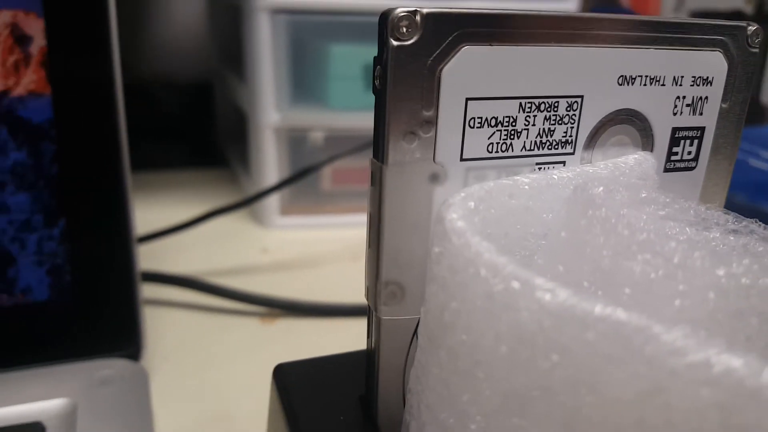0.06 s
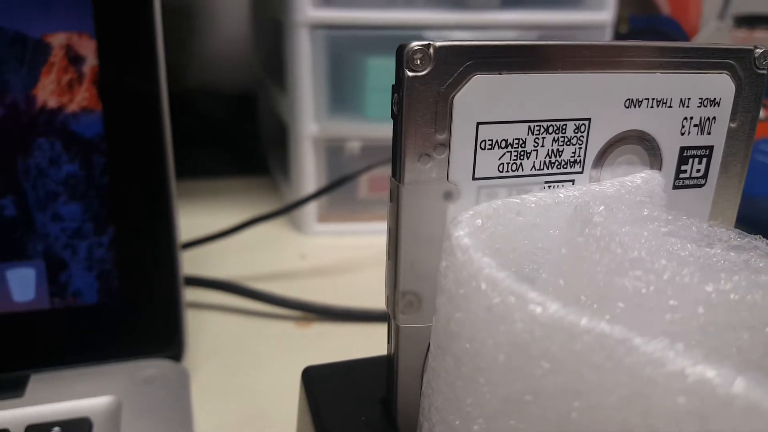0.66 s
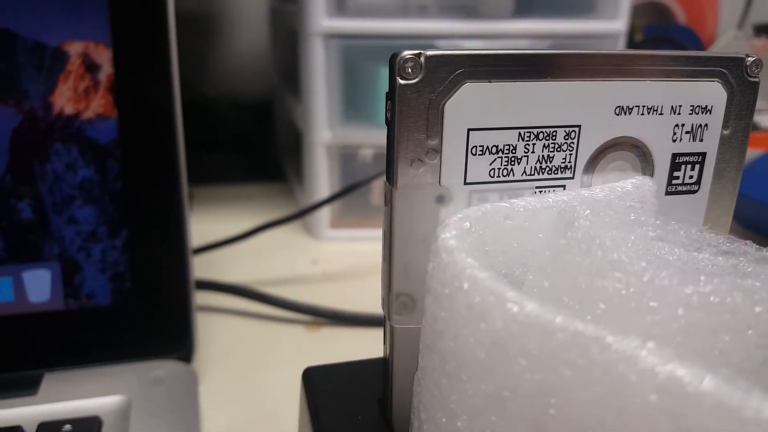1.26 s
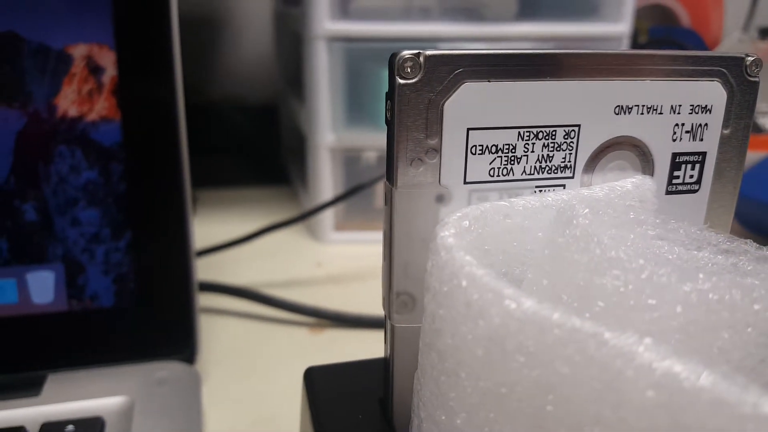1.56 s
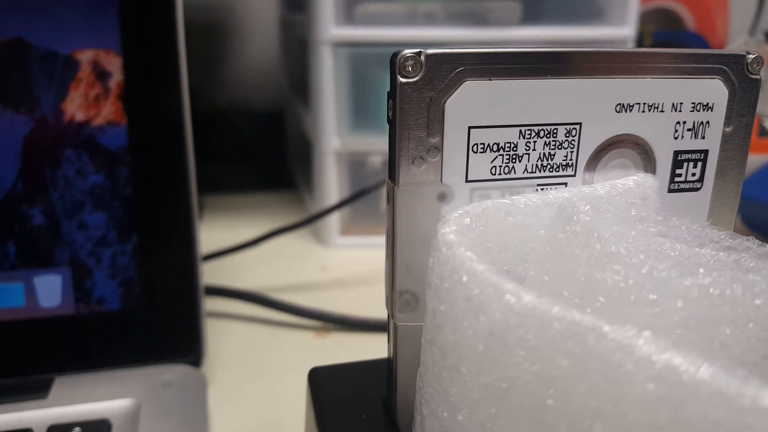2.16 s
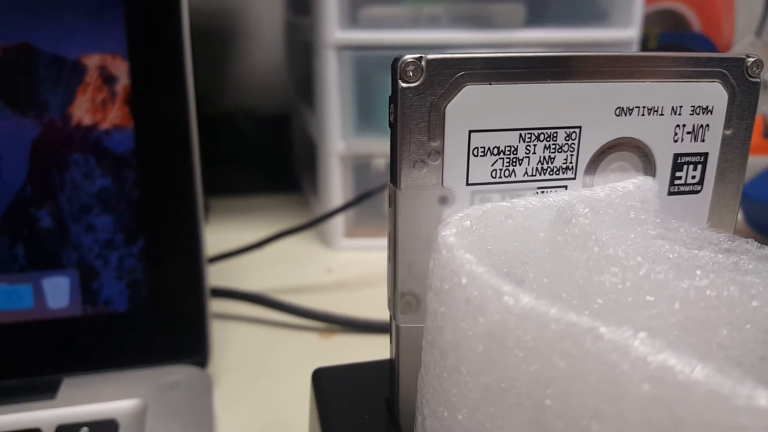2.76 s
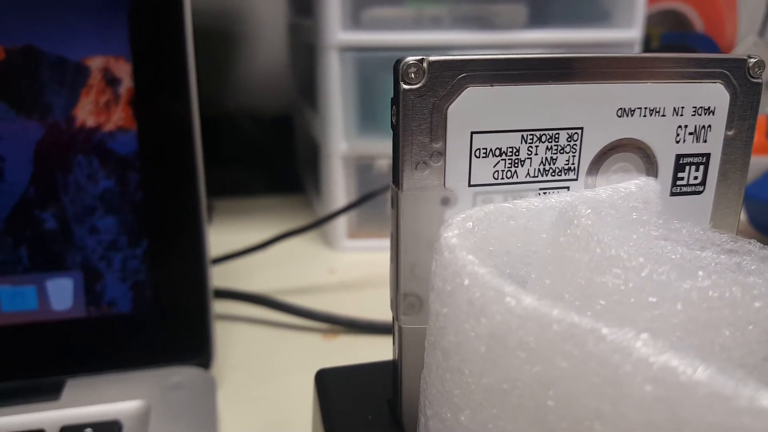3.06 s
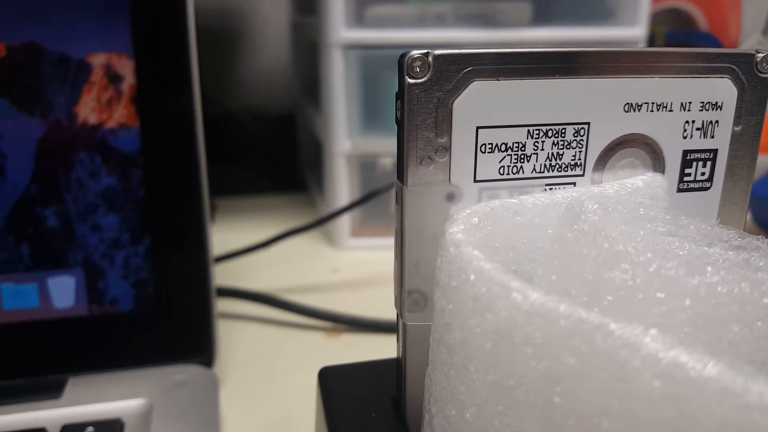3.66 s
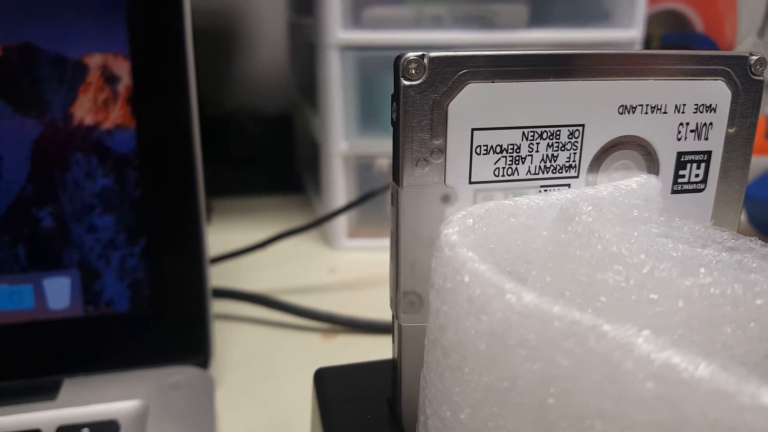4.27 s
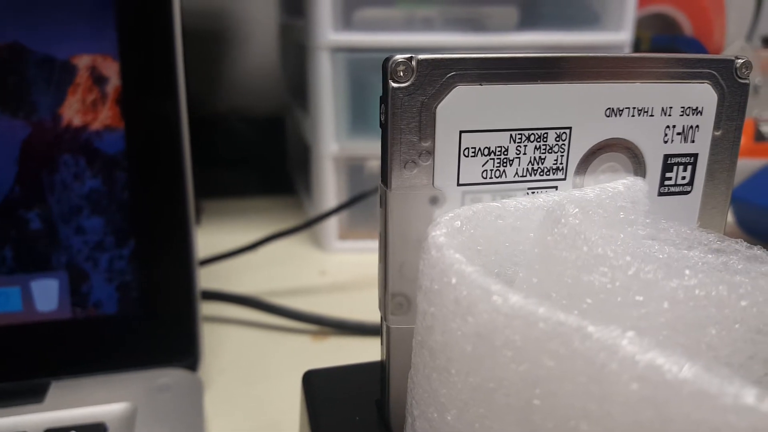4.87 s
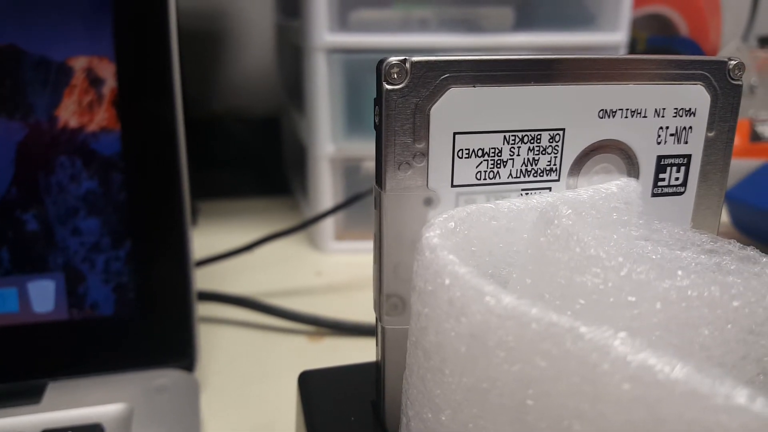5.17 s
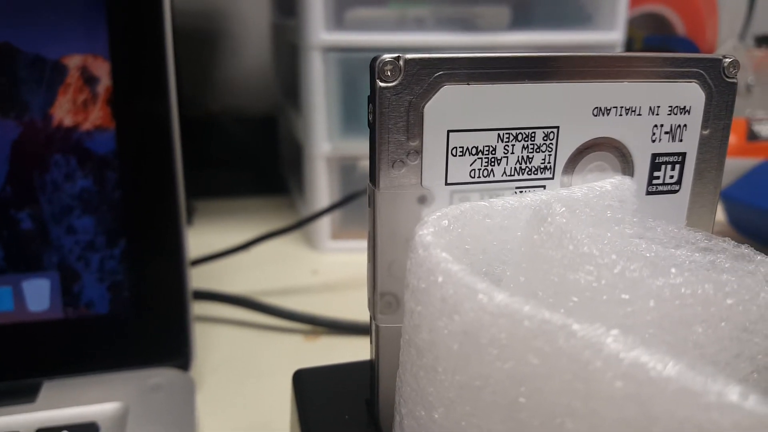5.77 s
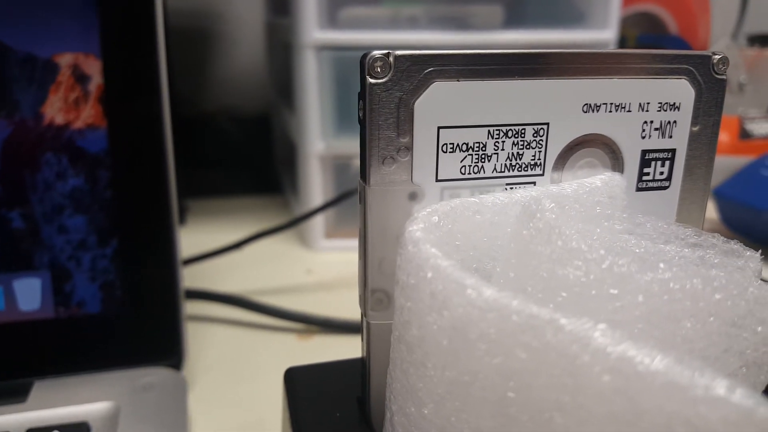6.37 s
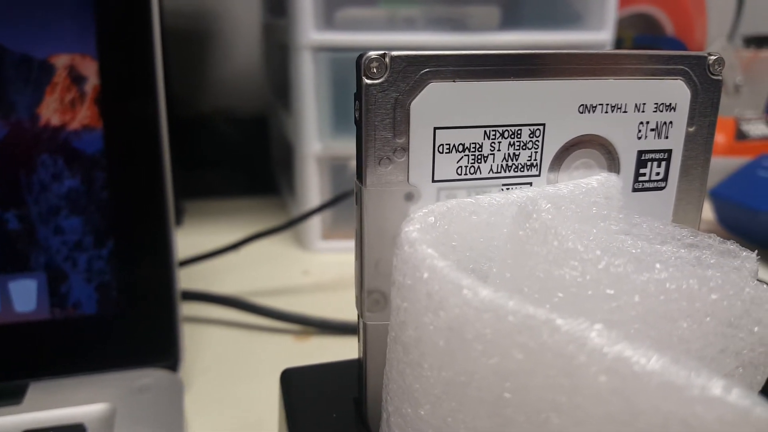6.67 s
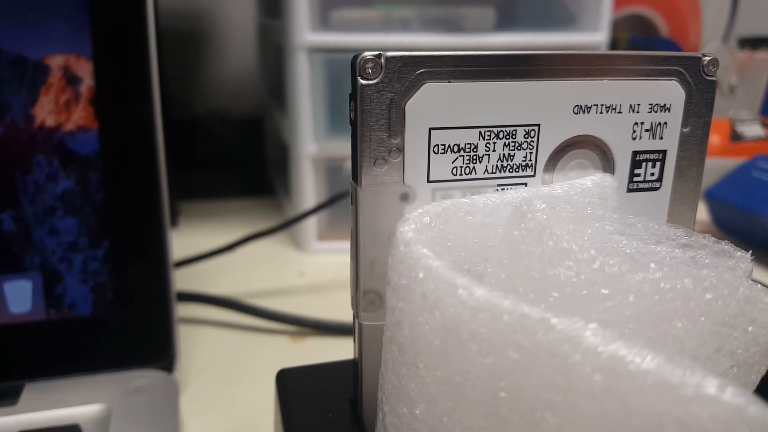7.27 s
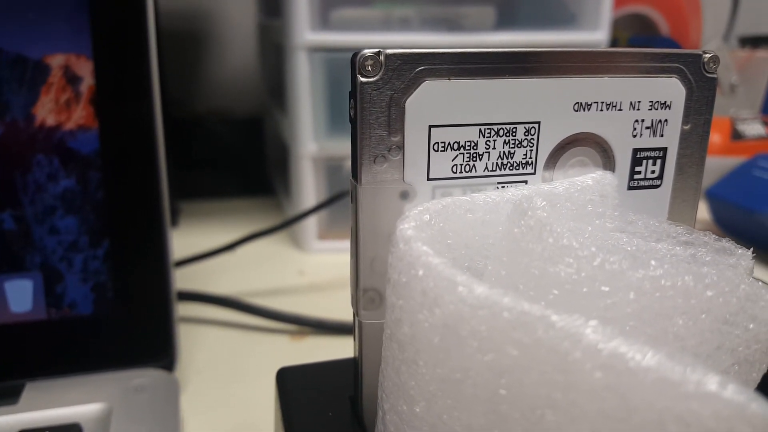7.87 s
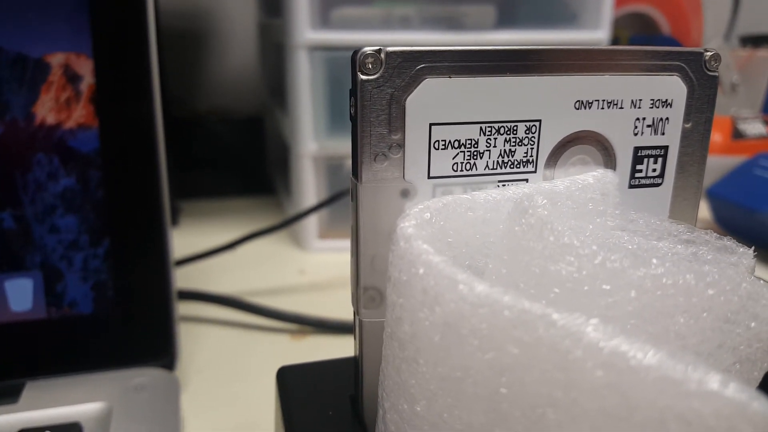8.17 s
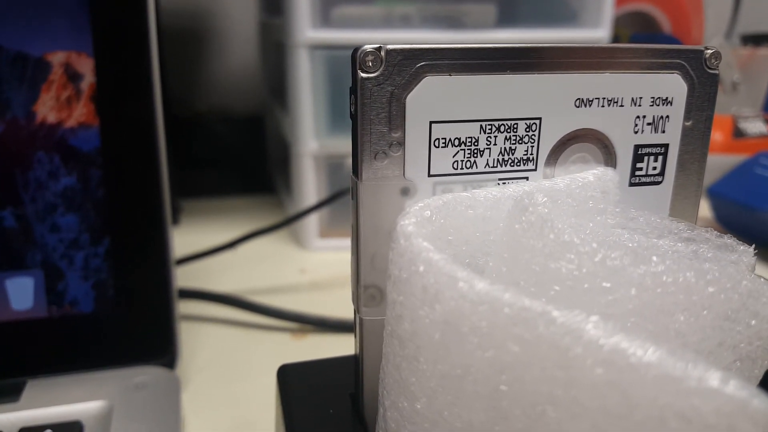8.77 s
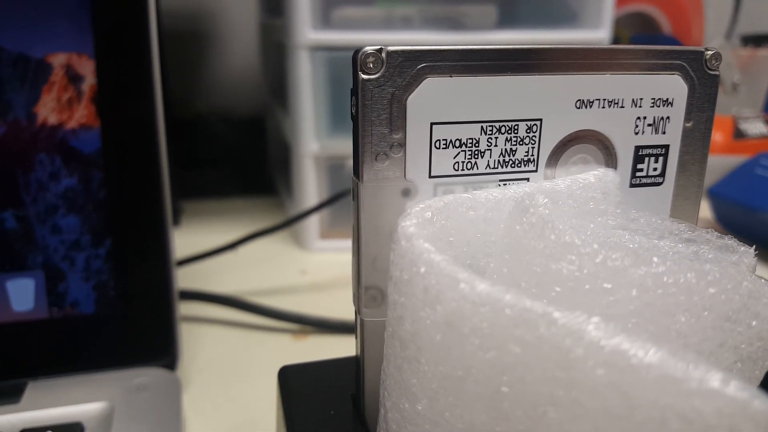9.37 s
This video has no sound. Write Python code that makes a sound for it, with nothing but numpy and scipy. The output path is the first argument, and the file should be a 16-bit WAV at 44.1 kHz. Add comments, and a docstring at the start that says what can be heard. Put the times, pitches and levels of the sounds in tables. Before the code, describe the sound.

Over a steady low rumble, a gently throbbing fan hum and a very faint high whine, a faulty hard drive stutters with quick runs of bright, scratchy, pinging clicks. It pauses and tries again, over and over. About four seconds in, an object gets one short, hollow, clattering knock, and then the bursts of clicking go on. The drive sounds close and fairly dry, indoors at a desk.

```python
"""On a desk, a failing laptop hard drive retries in bursts: its head arm swings and knocks on its stop.
Most swings scrape first, and a hard scrape brakes the landing. Each knock ticks in the casing and makes
the drive ping. Once, something is bumped: a hollow knock and a bright clatter.
Underneath sits a bed of room rumble, fan tones beating against the mains hum, and a thin high whine."""
import sys
import numpy as np
from scipy import signal
from scipy.fft import rfft, irfft
from scipy.io import wavfile

SR = 44100
rng = np.random.default_rng(int(sys.argv[2]) if len(sys.argv) > 2 else 0)


def inscribe(sig):
    """Save sig as 16-bit PCM at rate SR to the path in sys.argv[1].

    A 1-D sig is mono; a 2-D sig holds one channel per row.
    Samples are clipped to [-1, 1] before scaling.
    """
    pcm = np.round(np.clip(np.atleast_2d(sig).T, -1, 1) * 32767)
    wavfile.write(sys.argv[1], SR, pcm.astype(np.int16))


N = 424683

# the arm swings freely into its stop: (time [s], ping level [dB])
FREE_KNOCKS = [(0.501, -31.5), (1.102, -39), (2.3902, -37), (2.757, -38), (2.8788, -35.5), (3.001, -36.5),
               (3.2654, -36.5), (3.713, -34.5), (4.679, -35), (4.8593, -35), (6.7714, -34.5), (6.9673, -33),
               (7.512, -36), (9.0549, -35), (9.468, -34.5)]
# the arm scrapes, then lands: (time [s], length [s], treble rasp [dB], low buzz [dB], ping level [dB])
ARM_SCRAPES = [(0.3562, .009, -37.5, -49.5, -33.5), (0.428, 0.0067, -37, -50, -35.5),
               (0.551, .0079, -39, -50.5, -36.5), (0.9006, 0.011, -36.5, -50.5, -44),
               (0.9627, 0.0082, -36.5, -56, -32.5), (1.0318, 0.0047, -46, -64, -33.5),
               (1.148, 0.0085, -35.5, -49, -37), (1.205, .013, -63, -56, -85),
               (1.268, 0.011, -37.5, -54, -39), (2.438, 0.0072, -35, -56, -39),
               (2.502, 0.0046, -53, -60, -38), (2.558, 0.013, -59, -56, -36),
               (2.625, 0.0074, -36, -53, -38), (2.679, .011, -37, -51, -65), (2.801, 0.01, -60, -52, -34.5),
               (2.927, 0.0096, -37.5, -49.5, -65), (3.053, 0.0037, -40, -52, -70),
               (3.112, .012, -38, -50.5, -33.5), (3.183, 0.0085, -37, -51, -56),
               (3.509, 0.005, -55, -57, -37), (3.572, .013, -50.5, -52.5, -70),
               (3.64, .0097, -35, -51.5, -34.5), (4.335, .004, -58, -52, -90),
               (4.729, .0092, -54, -52.5, -36), (4.798, 0.0063, -35.5, -50, -49),
               (4.865, 0.0033, -35, -50, -65), (5.214, 0.0045, -34, -51.5, -43),
               (5.272, .011, -66, -59, -36), (5.334, .0105, -36.5, -51, -35),
               (5.394, .011, -61, -55, -34.5), (5.456, .0113, -61.5, -54, -39.5),
               (5.516, 0.011, -63.5, -57.5, -35), (5.578, 0.022, -62, -57, -90),
               (6.692, 0.017, -62, -55, -90), (6.817, 0.016, -37.5, -48, -47),
               (6.89, 0.0059, -35, -47.5, -34.5), (7.02, .0072, -51, -51, -39),
               (7.082, .012, -49.5, -56.5, -72), (7.155, 0.0039, -35.5, -44.5, -59),
               (7.56, .012, -47, -48.5, -79), (7.6273, .012, -51, -58, -34.5),
               (7.7001, 0.0072, -35, -52, -43), (8.037, 0.0039, -64, -57, -85),
               (8.114, 0.016, -60, -54.5, -90), (8.184, .0118, -47, -58, -32),
               (8.258, 0.0092, -43.5, -48.5, -73), (8.321, 0.011, -63, -58, -34.5),
               (8.679, 0.0052, -39.5, -51, -54), (8.736, .0044, -43.5, -59, -35),
               (8.795, 0.0051, -61, -55, -34.5), (8.85, 0.01, -65.5, -56, -33),
               (8.924, 0.0062, -38, -49, -53), (8.9906, 0.0051, -37, -49, -47),
               (9.391, 0.0096, -35.5, -59, -40), (9.515, 0.012, -60, -58, -34.5),
               (9.581, 0.012, -61, -53, -34.5)]
# some sweeps come with a low thump of the drive on its stand: (time [s], level [dB])
STAND_THUMPS = [(0.357, -51), (1.149, -50.5), (1.207, -55), (2.56, -59), (2.625, -54), (2.927, -51.5),
                (3.113, -60), (3.184, -52), (3.641, -55), (4.864, -57), (5.335, -52.5), (6.696, -52),
                (6.819, -58), (8.322, -58)]
# the drive's bright casing, its darker frame, the drive on its stand, and the bumped object:
# (frequency [Hz], width [Hz], level [dB], left minus right [dB])
CASING_MODES = [(2703, 220, -18.5, -11), (3170, 87, -13, 0), (3910, 39, -22, 13), (4445, 206, 1.5, 6),
                (4614, 270, -3.5, 9), (5220, 210, 1, 5), (5576, 190, 0.5, 0.5), (6000, 110, -6.5, -9),
                (6825, 184, 5.5, 2), (7367, 260, 2.5, -4.5), (8100, 240, -9.5, 3), (8420, 410, -5, 6),
                (8860, 160, -16, -10), (9570, 410, -16, 11), (10820, 520, -17, -18.5),
                (13450, 310, -18.5, 2), (15600, 500, -24, -12)]
FRAME_MODES = [(668, 120, -5, -2), (1185, 115, -6.5, 8), (1646, 34, 0, 9), (1765, 52, -8.5, -13),
               (2035, 36, 2.5, -2), (2262, 78, -5.5, -2)]
STAND_MODES = [(605, 41, -5.5, 1), (688, 42, -2, 2.5), (1133, 47, -9, 0)]
OBJECT_MODES = [(560, 27, -17, -2.5), (601, 26, -10.5, 0), (678, 20, -15, 0), (1000, 55, -20, 0),
                (1148, 52, -3, 4), (1390, 55, -9.5, 2.5), (1640, 90, -5.5, -8.5), (1830, 66, -1, -4),
                (2006, 52, 7.5, 0), (2100, 70, -4, -2), (2190, 60, -3, 0)]
# the bump and its rebound: (time [s], level [dB], tilt [dB/octave])
BUMP_HITS = [(3.7282, -27, -1), (3.7444, -35.5, -7)]
# the bursts of clatter: (time [s], length [s], level [dB])
CLATTER_BURSTS = [(3.725, 0.0063, -36), (3.739, .003, -37), (3.7437, 0.0039, -26.5), (3.756, 0.0048, -36.5)]
# the clatter's colour: (frequency [Hz], gain [dB])
CLATTER_EQ = [(200, -16), (550, 0), (2200, 3), (3300, -7.5), (5400, -3.5), (7300, -1), (8700, 0),
              (9600, -9), (12500, -14.5), (15500, -8)]
# the room's tail: (frequency [Hz], time to fall 60 dB [s])
REVERB_TIMES = [(500, 0.34), (2000, 0.26), (5200, 0.34), (8000, 0.18), (15000, 0.25)]
# the rumble's colour: (frequency [Hz], gain [dB])
RUMBLE_EQ = [(20, -20), (45, -14), (90, -3), (117, -6), (170, -2), (280, -10), (420, -17.5), (700, -24),
             (1100, -31), (1900, -32), (3500, -44), (6500, -50), (10000, -55.5), (15500, -50.5)]
# how centred the rumble sits: (frequency [Hz], left-right correlation [0-1])
RUMBLE_CORRELATION = [(60, 0.94), (150, 0.95), (300, 0.94), (640, 0.35), (1400, 0.059), (6000, 0.12)]
# wavering bands of fan hum and of whine: (frequency [Hz], width [Hz], level [dB])
HUM_BANDS = [(55.4, 2.3, -59.5), (149.3, 1.3, -55.5), (352.2, 10, -68)]
WHINE_BANDS = [(7770, 60, -81), (7980, 500, -77), (8160, 35, -81)]
# two fan tones and the mains hum: (frequency [Hz], level at the swell [dB])
BEATING_TONES = [(112.84, -54.5), (116.33, -51.5), (119.98, -52.5)]
# the ping's harmonics: (multiple of the pitch, relative level [dB])
PING_HARMONICS = [(1, -2.5), (2, -25), (3, -38)]

HIT_S = .005  # ticks, thuds and pings carry the energy of their level held this long
LIGHT_RASP_DB, HARD_RASP_DB = -41, -36.5  # a scrape starts to brake the arm; it brakes it fully


def landings(coast_s=.0075, free_tick_db=-37.5, braking_db=6, full_ping_db=-40):
    """Cue list of the arm's landings, free or braked: (time [s], tick level [dB], ping level [dB])."""
    cues = [(s, free_tick_db, ping_db) for s, ping_db in FREE_KNOCKS]
    for s, length, rasp_db, _, ping_db in ARM_SCRAPES:
        braked = np.clip((rasp_db - LIGHT_RASP_DB) / (HARD_RASP_DB - LIGHT_RASP_DB), 0, 1)
        soft_landing_db = 0.65 * min(ping_db - full_ping_db, 0)  # a weak ping comes with a weak tick
        tick_db = free_tick_db - braking_db * braked + soft_landing_db
        cues.append((s + length + coast_s, tick_db, ping_db))
    return cues


def landing_force(gap_s=.0021, grit=0.39):
    """A tight flam: first touch, then the landing, with grit running through both."""
    gap = round(gap_s * SR)
    force = np.pad(grit * chatter(0.00392), (0, gap))
    force[[0, gap]] += 1
    return force


def knocks(thud_db=-21):
    """The arm lands on its stop: the casing ticks and the frame thuds faintly."""
    out = np.zeros((2, N))
    casing, frame = ring(CASING_MODES, wide_hz=3980), ring(FRAME_MODES, wide_hz=3000)
    for s, tick_db, ping_db in landings():
        force = landing_force()
        place(out, s, struck(force, casing), tick_db, HIT_S)
        place(out, s, struck(force, frame), ping_db + thud_db, HIT_S)
    return out


def pings(pitch_hz=5216, swell_s=0.0011, right_lag_s=0.0010846, linger_db=-27):
    """Each landing rings a bright tone that swells and dies in milliseconds, leaving a faint ring."""
    out = np.zeros((2, N))
    age = np.maximum(np.arange(4000) / SR - np.array([[0], [right_lag_s]]), 0)
    rise = age / swell_s
    flash = (rise / 3) ** 3 * np.exp(3 - rise)
    linger = np.exp(-(age / .026) ** 2) * np.tanh(rise / 2) ** 2
    envelope = flash + gain_of(linger_db) * linger
    pan = gain_of([[-1.4], [1.4]])
    for s, _, ping_db in landings():
        hz = pitch_hz * (1 + 0.0032 * rng.standard_normal())
        tone = sum(gain_of(db) * np.sin(2 * np.pi * k * hz * age) for k, db in PING_HARMONICS)
        place(out, s, envelope * tone * pan, ping_db, HIT_S)
    return out


def scrapes(dulling=0.7, thump_s=0.0098):
    """The sweeping arm chatters, duller at a light touch; some sweeps come with a low stand thump."""
    out = np.zeros((2, N))
    frame = ring(FRAME_MODES, wide_hz=2480, size=1800)
    stand = ring(STAND_MODES, wide_hz=1500, size=2500)
    for s, length, rasp_db, buzz_db, _ in ARM_SCRAPES:
        tilt = dulling * min(rasp_db - HARD_RASP_DB, 0)
        casing = ring(tilted(CASING_MODES, tilt, above_hz=3400), wide_hz=4040, size=900)
        place(out, s, struck(chatter(length), casing), rasp_db, length)
        place(out, s, struck(chatter(length), frame), buzz_db, length)
    for s, db in STAND_THUMPS:
        place(out, s, struck(chatter(thump_s), stand), db, thump_s)
    return out


def chatter(length, spread_db=2.5, contacts_per_s=9000):
    """Grit: a run of tiny, uneven contacts with an abrupt attack."""
    count = max(round(length * SR), 20)
    polarity = np.sign(rng.standard_normal(2000))
    strength = gain_of(spread_db * rng.standard_normal(2000))
    touching = rng.random(2000) < contacts_per_s / SR
    return (polarity * strength * touching)[:count] * signal.windows.tukey(count, .12) + 1e-9


def ring(modes, wide_hz, attack_s=0.00024, size=6000):
    """A body's stereo ring: modes lag on alternate sides, by a full quarter cycle from wide_hz up."""
    t, out = np.arange(size) / SR, np.zeros((2, size))
    side = np.array([[1], [-1]])
    for k, (hz, width, db, pan_db) in enumerate(modes):
        sign = (-1) ** k
        lag_s = min(hz / wide_hz, 1) / (4 * hz)
        age = np.maximum(t - (side == sign) * lag_s, 0)
        envelope = np.sqrt(width) * np.exp(-np.pi * width * age) * (1 - np.exp(-age / attack_s))
        out += sign * gain_of(db + side * pan_db / 2) * envelope * np.sin(2 * np.pi * hz * age)
    return out


def tilted(modes, db_per_octave, above_hz=500):
    """A softer blow dulls the modes above a corner."""
    return [(hz, width, db + db_per_octave * np.log2(max(hz / above_hz, 1)), pan)
            for hz, width, db, pan in modes]


def struck(force, body):
    """Plays a force through a body's ring."""
    return signal.fftconvolve(force[None], body, axes=1)


def bump(build_s=.003, clatter_t60_s=0.022):
    """Something is bumped: a hollow, soft-edged knock, a duller rebound and a bright, grainy clatter."""
    out, t = np.zeros((2, N)), np.arange(6000) / SR
    push = 1 - np.exp(-(t / build_s) ** 2)
    for s, db, tilt in BUMP_HITS:
        body = ring(tilted(OBJECT_MODES, tilt), wide_hz=2600, size=len(t))
        place(out, s, body * push, db, length=.012)
    for s, length, db in CLATTER_BURSTS:
        attack = np.minimum(t / 0.00075, 1)
        release = gain_of(-60 * np.maximum(t - length, 0) / clatter_t60_s)
        grains = rng.standard_normal((2, len(t))) * gain_of(1.6 * rng.standard_normal(len(t)))
        place(out, s, equalised(attack * release * grains, CLATTER_EQ), db, length)
    return out


def reverb(x, early_db, tail_db, size=16000):
    """Early reflections off the desk and the things on it, then a short tail."""
    t = np.arange(size) / SR
    taps = rng.choice([-1., 1.], (2, size)) * (rng.random((2, size)) < 3000 / SR) * (t > .004)
    hz, age, spectrum = signal.stft(taps, SR, nperseg=256)
    decay = gain_of(-60 * age / curve_at(REVERB_TIMES, hz)[:, None])
    tail = signal.istft(spectrum * decay, SR, nperseg=256)[1][:, :size]
    early = rng.standard_normal((2, size)) * (t > .003) * np.exp(-(t / 0.013) ** 2)
    response = (gain_of(tail_db) * unit_rms(tail) + gain_of(early_db) * unit_rms(early)) / np.sqrt(size)
    return signal.fftconvolve(x, response, axes=1)[:, :N]


def rumble(level_db=-45.5):
    """Room tone: dark noise, centred in the lows and wide in the highs."""
    left, unrelated = rfft(rng.standard_normal((2, N)))
    shared = curve_at(RUMBLE_CORRELATION, np.fft.rfftfreq(N, 1 / SR))
    right = shared * left + np.sqrt(1 - shared ** 2) * unrelated
    noise = irfft(np.array([left, right]), N)
    return gain_of(level_db) * unit_rms(equalised(noise, RUMBLE_EQ))


def fan_throb(swell_s=8.4, rise_db_per_s=0.3, flutter_db=-54):
    """Fan tones beat against the mains hum, and the whole hum slowly grows louder; flutter makes the beats
    uneven."""
    t = np.arange(N) / SR - swell_s  # the tones line up in phase at the swell
    phase = rng.random()
    tones = sum(gain_of(db) * np.sqrt(2) * np.cos(2 * np.pi * (hz * t + phase))
                for hz, db in BEATING_TONES)
    flutter = gain_of(flutter_db) * wavering_tone(hz=116.6, width=5.7)
    return (tones + flutter) * gain_of(rise_db_per_s * t)


def drone(bands):
    """A hum or whine, layered from wavering tones."""
    return sum(gain_of(db) * wavering_tone(hz, width) for hz, width, db in bands)


def wavering_tone(hz, width):
    """Noise through one narrow resonance."""
    detuning = (np.fft.rfftfreq(N, 1 / SR) - hz) / (0.64 * width)
    return unit_rms(irfft(rfft(rng.standard_normal(N)) / (1 + detuning ** 2), N))


def background():
    """The bed, leaning slightly left: rumble, mono fan hum and a diffuse whine."""
    air = rumble()
    hum = fan_throb() + drone(HUM_BANDS)
    whine = np.array([drone(WHINE_BANDS) for _ in range(2)])
    return (air + hum + whine) * gain_of([[.7], [-.7]])


def place(mix, s, sound, db, length):
    """Drops a stereo sound in at time s, with the energy of db held for length seconds."""
    energy = np.sum(sound ** 2) / 2 + 1e-20
    slot = mix[:, round(s * SR):][:, :sound.shape[1]]
    slot += sound[:, :slot.shape[1]] * gain_of(db) * np.sqrt(length * SR / energy)


def equalised(x, eq):
    """Colours a sound with an EQ curve."""
    hz = np.fft.rfftfreq(x.shape[-1], 1 / SR)
    return irfft(rfft(x) * gain_of(curve_at(eq, hz)), x.shape[-1])


def curve_at(points, hz):
    """Reads a curve on a log-frequency axis."""
    point_hz, value = np.transpose(points)
    return np.interp(np.log(hz + 1), np.log(point_hz + 1), value)


def gain_of(db):
    """Decibels to amplitude."""
    return 10 ** (np.asarray(db) / 20)


def unit_rms(x):
    """Scales to rms 1."""
    return x / np.sqrt(np.mean(x ** 2) + 1e-20)


def scene(ping_send_db=-8):
    """The mix: the drive is close and dry, its pings driest of all; the bump stirs the room more."""
    clicks, tones, clunk = knocks() + scrapes(), pings(), bump()
    drive_reverb = reverb(clicks + gain_of(ping_send_db) * tones, early_db=-14, tail_db=-19)
    bump_reverb = reverb(clunk, early_db=-10.5, tail_db=-16)
    return clicks + tones + clunk + drive_reverb + bump_reverb + background()


def record(dry, cutoff_hz=15900):
    """A steep low-pass trims the very top."""
    low_pass = signal.firwin(401, cutoff_hz, window=("kaiser", 8), fs=SR)
    return signal.oaconvolve(dry, low_pass[None], "same")


dry = scene()
out = record(dry)
inscribe(out)
```